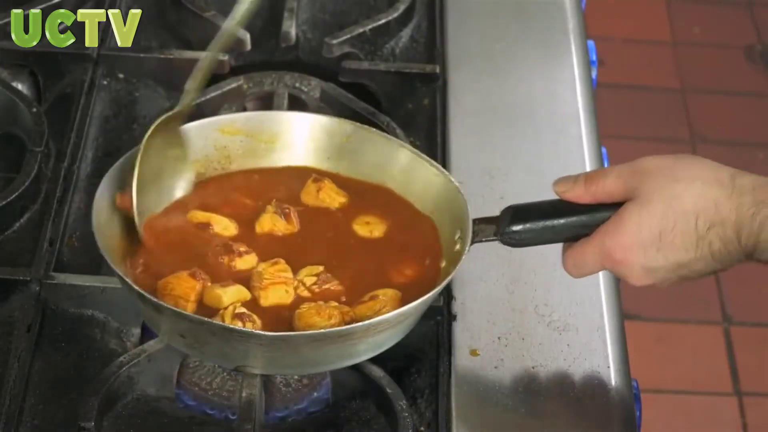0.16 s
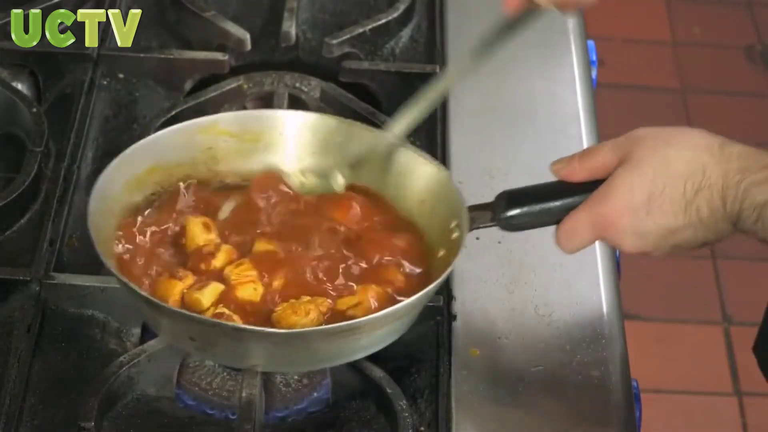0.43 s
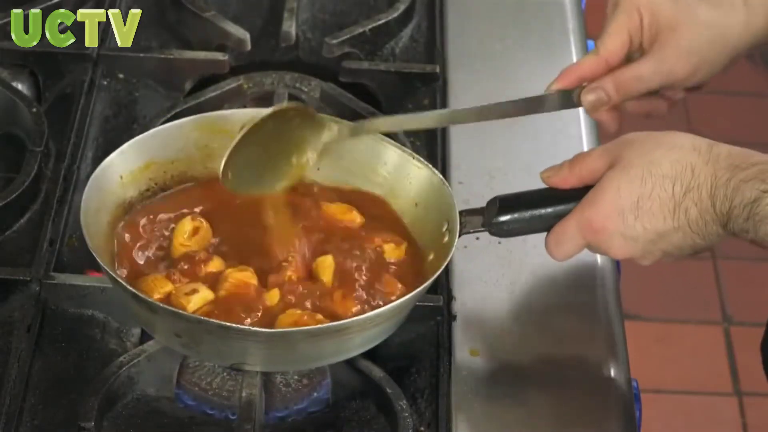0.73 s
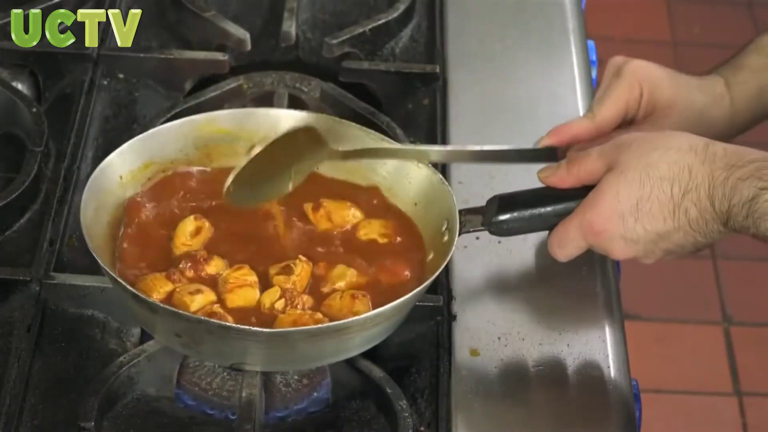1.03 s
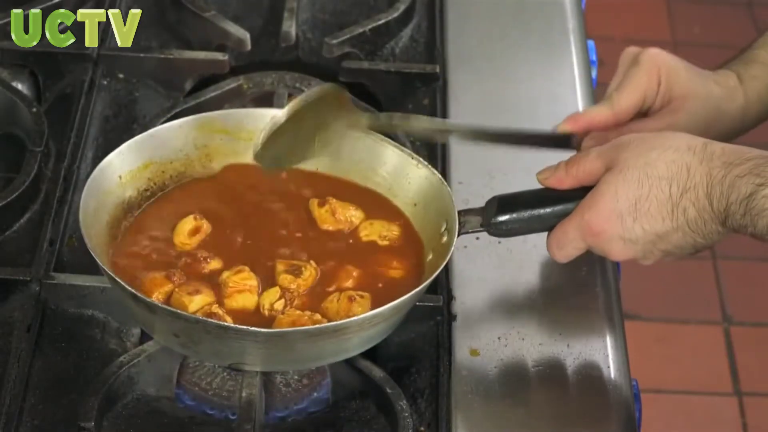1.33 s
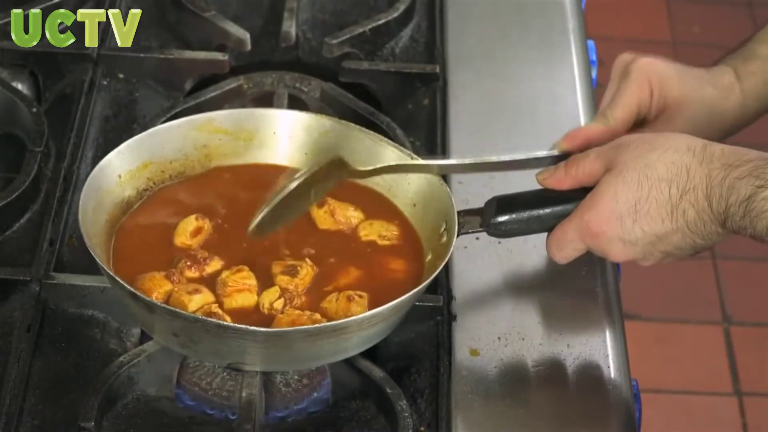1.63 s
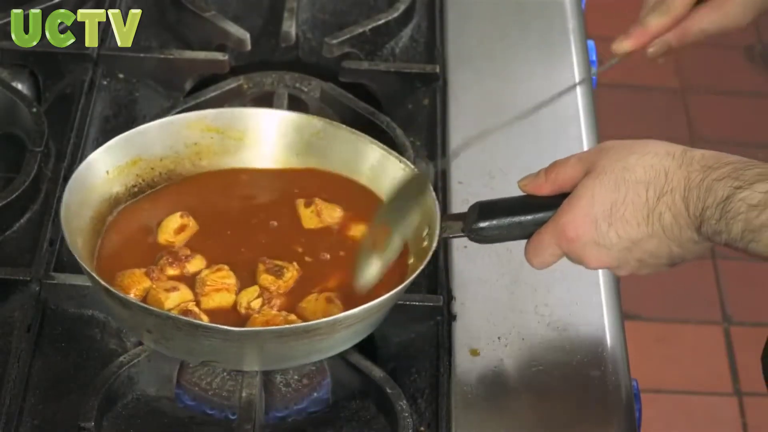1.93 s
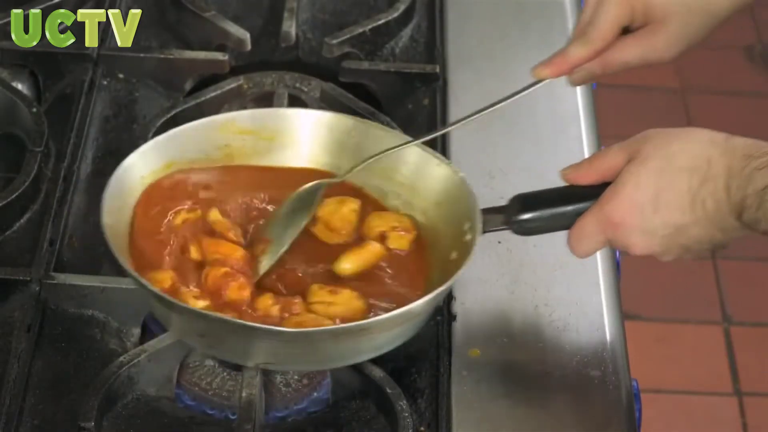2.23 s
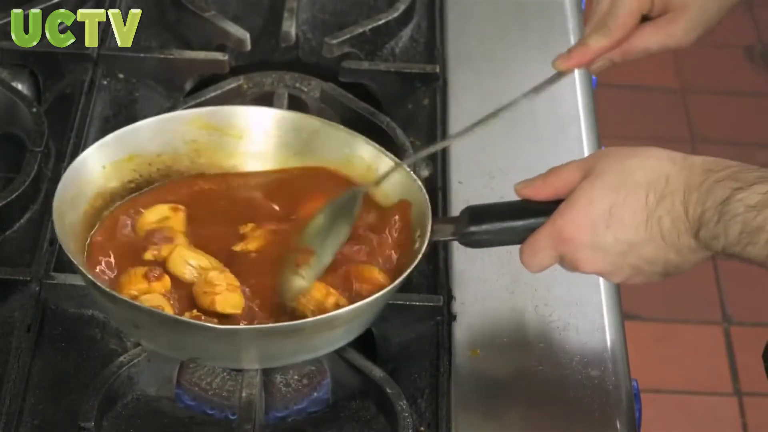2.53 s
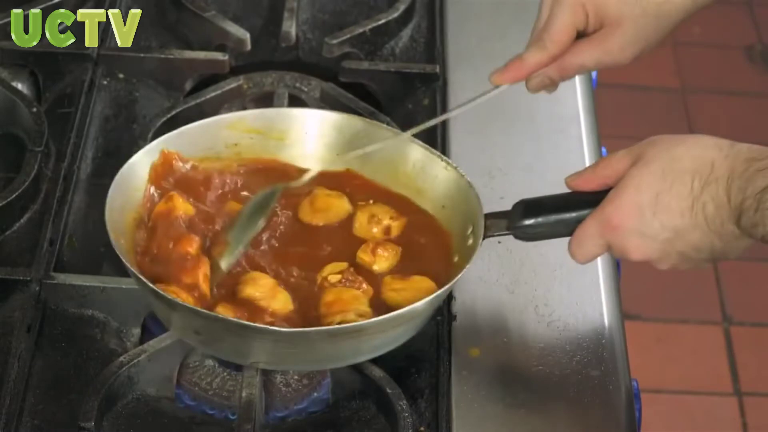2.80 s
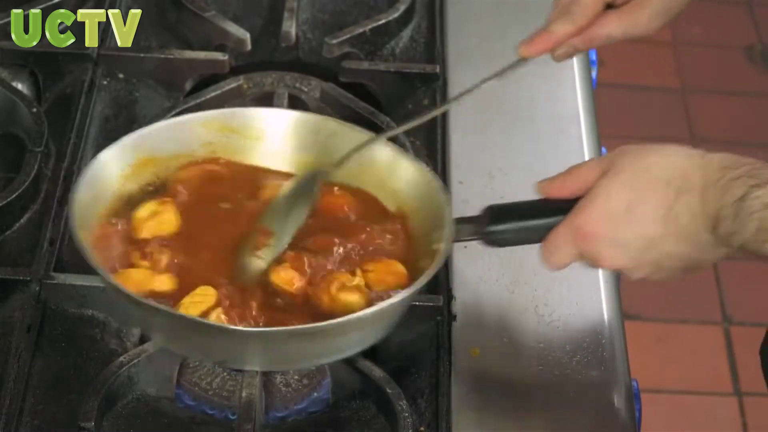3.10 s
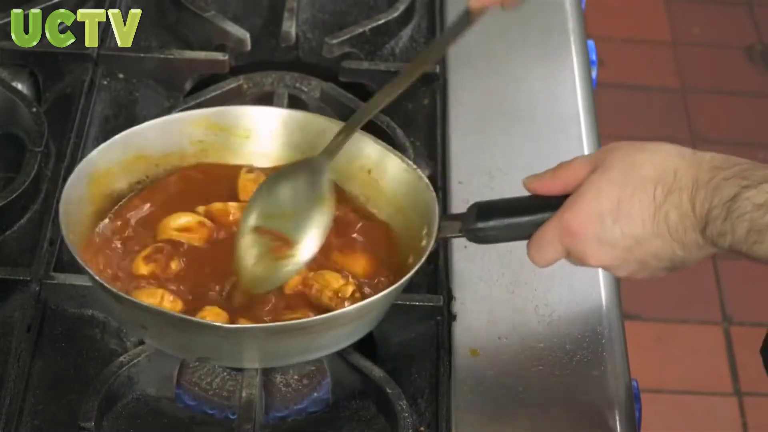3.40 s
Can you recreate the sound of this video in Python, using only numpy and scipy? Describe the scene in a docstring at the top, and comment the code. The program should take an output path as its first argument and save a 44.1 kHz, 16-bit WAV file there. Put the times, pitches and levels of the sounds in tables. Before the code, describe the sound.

A metal spoon scrapes through sauce in a steel frying pan, knocks four times on the ringing rim, then drops back in and stirs on. Faint sizzling, a fan hum and a gas burner lie underneath in a kitchen.

```python
"""A kitchen fan hums and a gas burner rushes under chicken curry sizzling on a hot frying pan.
A steel spoon squelches through the sauce; its slips and catches excite pan and spoon resonances.
It clacks in the pan, is knocked clean four times on the ringing rim, drops back in and stirs on.
The tiled kitchen adds a short tail; a limiter ducks the hum under each knock."""
import sys
import numpy as np
from scipy import signal
from scipy.io import wavfile
from scipy.ndimage import uniform_filter1d

SR = 44100
rng = np.random.default_rng(int(sys.argv[2]) if len(sys.argv) > 2 else 0)


def bounce(signal):
    """Save signal as a 16-bit WAV file at the path given by the first command-line argument."""
    frames = np.transpose(np.atleast_2d(signal))
    limited = np.clip(frames, -1, 1)
    pcm = np.round(limited * 32767).astype(np.int16)
    wavfile.write(sys.argv[1], SR, pcm)


N = 156555
TIME, HZ = np.arange(N) / SR, np.fft.rfftfreq(8192, 1 / SR)

# fan tones: f/Hz, level/dB
FAN_TONES = [(87, -56), (100.4, -42), (107, -57), (200.8, -58.5), (245.5, -60.5), (301.2, -65.5)]
# sizzle and squelch envelopes: t/s, level/dB
SIZZLE_ENVELOPE = [(0, -49.5), (.08, -49.5), (.25, -49.5), (.45, -48), (.6, -63), (.75, -55), (.85, -61.5),
                   (.95, -76), (1.2, -56), (2.08, -75), (2.2, -55), (2.38, -61), (2.55, -54.5), (2.73, -48),
                   (2.86, -57), (3.1, -54), (3.42, -49), (3.55, -64.5)]
SQUELCH_ENVELOPE = [(0, -53.5), (.18, -48.5), (.3, -51.5), (.45, -43), (.62, -55.5), (.8, -56), (1, -62.5),
                    (2.05, -64.5), (2.25, -43.5), (2.4, -51), (2.55, -46.5), (2.63, -52), (2.75, -43.5),
                    (2.87, -57), (2.95, -42), (3.1, -52.5), (3.35, -51), (3.55, -55.5)]
# spits of hot sauce: t/s, f/Hz, level/dB
SPITS = [(0.027, 14000, -43), (0.061, 13700, -42), (.215, 14500, -42), (0.312, 11800, -41),
         (0.78, 5450, -40.5), (0.997, 10400, -46), (2.726, 9800, -41.5), (3.459, 14200, -44),
         (3.538, 10500, -41)]
# spoon strokes: t/s, length/s, level/dB, tilt/(dB/oct), lower and upper spoon mode f/Hz, sauce heap/0-1
STROKES = [(0.142, 0.059, -52, -1, 2910, 4470, 0.63), (.25, 0.034, -49.5, 4, 2040, 4800, 0.76),
           (0.333, 0.066, -41.5, 4, 1850, 4620, 0.68), (0.426, 0.045, -34.5, 6, 1910, 4700, 1),
           (2.131, 0.17, -42, 4.5, 2090, 5020, 0.16), (2.412, 0.13, -46, 0, 2400, 4380, 0.43),
           (2.632, 0.093, -35, -0.5, 2330, 4570, 0.12), (2.897, 0.033, -45, -3, 2340, 3300, 0.15),
           (2.938, 0.041, -32.5, 3, 2190, 3970, 0.17), (2.992, 0.06, -33, 1, 2740, 4100, 0.22),
           (3.135, 0.037, -40.5, -1.5, 2600, 4740, 0.08), (3.168, 0.039, -27, 0, 1800, 4650, 0.02),
           (3.205, 0.035, -27, -2, 2380, 4370, .03)]
# spoon edge catching: t/s, level/dB
CATCHES = [(0.153, -35), (0.17, -30), (0.174, -25), (.187, -30.5), (0.261, -30.5), (.2793, -37),
           (0.3425, -25), (0.4316, -30), (0.4391, -29), (2.192, -24.5), (2.2186, -20), (2.247, -26),
           (2.2538, -15.5), (2.284, -32), (2.4208, -40.5), (2.4536, -26), (2.4699, -30), (2.478, -27),
           (2.504, -28), (2.6513, -28), (2.672, -25), (2.6897, -13.5), (2.7063, -13.5), (2.8989, -28),
           (2.916, -19), (2.943, -19.5), (2.98, -22), (3.016, -21), (3.025, -23), (3.054, -19),
           (3.1487, -32), (3.1539, -25), (3.162, -20), (3.178, -11), (3.2083, -21.5), (3.243, -12),
           (3.258, -27), (3.3264, -30)]
# filled pan modes: f/Hz, width/Hz, boost/dB
PAN_MODES = [(1060, 42, 17), (1650, 56, 10), (2470, 48, 13), (3890, 110, 6)]
# spoon landings: t/s, level/dB, cutoff f/Hz, T60/s, thud level/dB, clank f/Hz, clank boost/dB
CLACKS = [(0.6891, -19, 2560, 0.053, -24.5, 1845, 7), (0.7141, -40.5, 2400, 0.089, -46, 2530, 15),
          (2.0907, -20, 12400, 0.056, -58, 4440, 13), (2.1082, -10, 6450, 0.059, -29, 4100, 8),
          (3.3820, -19.5, 3200, 0.028, -29, 6820, 19), (3.417, -33, 2180, 0.1, -34.5, 2070, 9)]
# rim knocks: t/s, level/dB, tilt/(dB/oct), rebound delay/s, rebound level/dB,
# resonance f/Hz, its boost/dB, singing partial f/Hz
KNOCKS = [(1.0435, -18, -0.5, .023, -10, 2020, 10, 10040), (1.252, -13.5, 0, .023, -12, 880, -7, 7720),
          (1.4723, -15.5, -0.23, .022, -14.5, 1210, 3.5, 5960),
          (1.7113, -9.5, 0.63, 0.0092, -49.5, 1380, 7.5, 10097)]
# ringing modes of pan and spoon: f/Hz, level/dB
RING_MODES = [(598, -7), (897, -3), (938, -7), (997, -3), (1066, -4), (1168, -1), (1268, -4), (1429, -4),
              (1648, -2), (2035, 0), (2225, -4), (3905, -8), (4374, -9), (5210, -10), (5647, -10),
              (5938, -8), (6427, -8), (6562, -9), (7714, -9), (7988, -11), (10200, -11), (10960, -15),
              (13124, -17)]
# source spectral shapes: f/Hz, relative level/dB
BURNER_SHAPE = [(20, 7), (55, -7), (75, 0), (95, 26.5), (115, 5), (150, -2), (190, 6), (300, -1),
                (500, -12.5), (1000, -35.5), (3000, -31), (8000, -20), (15000, -27)]
SIZZLE_SHAPE = [(200, 13), (1500, 7.5), (4000, 2), (7000, -5), (11000, -6), (15500, -7.5)]
SQUELCH_SHAPE = [(60, -11), (180, -9.5), (330, 4), (500, -1), (900, -5), (2000, -19.5), (5000, -59)]
SCRAPE_SHAPE = [(100, -23), (400, -12), (800, -12), (1250, -4.5), (1600, -3), (2300, -7.5), (3300, 0),
                (4400, -14), (6000, -16), (9000, -26), (11500, -29.5), (15000, -46)]
CLACK_SHAPE = [(100, -29.5), (500, -11.5), (1100, -20), (1500, -9), (2000, -1), (2400, -3.5), (2850, -10.5),
               (3600, -16.5), (4200, -10.5), (4800, -13), (5400, -10), (7000, -16.5), (11500, -11.5),
               (15000, -19)]
THUD_SHAPE = [(40, -9.5), (150, -13), (350, 0), (600, -4), (1100, -3.5), (2500, -23), (15000, -102)]
KNOCK_SHAPE = [(60, -18.5), (200, -6.5), (500, -8), (1000, -2), (2100, -3.5), (3200, -10), (4700, -11.5),
               (6000, -8), (7300, -10), (8100, -11.5), (8800, -15.5), (10700, -11), (12500, -27),
               (13200, -17.5), (15500, -33.5)]
REBOUND_SHAPE = [(60, -42), (500, 3.5), (1100, 7.5), (2600, -1), (4000, -2.5), (8000, -47), (15000, -35)]
# decay by band: f/Hz, T60/s
KNOCK_DECAY = [(200, 0.66), (600, 0.21), (1500, 0.22), (3500, 0.27), (6500, 0.32), (10000, 0.26),
               (15000, 0.44)]
ROOM_DECAY = [(200, 0.2), (1500, 0.2), (5000, 0.13), (15000, 0.32)]


def amp(db):
    """Decibels to gain."""
    return 10 ** (np.asarray(db) / 20)


def unit(x):
    """Scale to rms 1."""
    return x / np.sqrt(np.mean(x ** 2) + 1e-20)


def fade(t, t60_s):
    """Exponential decay."""
    return np.exp(-np.log(1000) * t / t60_s)


def read(points, hz=HZ):
    """Interpolate a table over log frequency."""
    f, value = np.transpose(points)
    return np.interp(np.log(hz + 1), np.log(f), value)


def envelope(points):
    """Gain per sample from a level table."""
    return amp(np.interp(TIME, *np.transpose(points)))


def add(mix, start_s, sound):
    """Mix a sound in at start_s."""
    part = mix[max(round(start_s * SR), 0):][:len(sound)]
    part += sound[:len(part)]


def tilt(db_per_oct):
    """Slope in dB about 2 kHz, flat below 500 Hz."""
    return db_per_oct * np.log2(np.maximum(HZ, 500) / 2000)


def bump(hz, width_hz, db):
    """One resonance as a boost in dB."""
    return db / (1 + (2 * (HZ - hz) / width_hz) ** 2)


def colour(x, shape_db):
    """Minimum-phase filter of unit energy."""
    log_gain = np.log(amp(np.r_[shape_db, shape_db[-2:0:-1]]))
    response = np.exp(np.conj(signal.hilbert(log_gain)))
    taps = np.fft.ifft(response).real[:len(shape_db)]
    return signal.fftconvolve(x, taps / np.linalg.norm(taps))[:len(x)]


def drift(size, step_s):
    """Gaussian values step_s apart, joined by lines."""
    return np.interp(np.arange(size) / SR / step_s, np.arange(N), rng.standard_normal(N))


def grains(size, per_s, spread_db):
    """Random clicks, rms 1."""
    chance, strength, sign = rng.random((3, N))[:, :size]
    gain = amp(-spread_db * np.log(np.maximum(strength, .015)))
    return unit((chance < per_s / SR) * gain * np.sign(sign - .5))


def burst(shape_db, t60_s):
    """Dense modes as noise decaying from rms 1; t60_s is a number or a table by band."""
    noise = unit(colour(rng.choice([-1., 1.], SR), shape_db))[SR // 3:]
    hz, t, bands = signal.stft(noise, SR, nperseg=256)
    band_t60_s = read(t60_s, hz)[:, None] if np.ndim(t60_s) else t60_s
    return signal.istft(bands * fade(t, band_t60_s), SR, nperseg=256)[1]


def fan(waver_db=.7):
    """Wavering hum; neighbouring tones beat."""
    out = np.zeros(N)
    for hz, db in FAN_TONES:
        gain = amp(db + waver_db * drift(N, step_s=.08))
        out += gain * unit(np.sin(2 * np.pi * (hz * TIME + rng.random())))
    return out


def burner(level_db=-47):
    """Steady low rush of the gas flame."""
    return amp(level_db) * colour(rng.standard_normal(N), read(BURNER_SHAPE))


def sizzle(decay_cycles=5, spurt_db=5.5, hiss_db=-2.5):
    """Tiny bubbles burst on hot steel in spurts, over a fine hiss."""
    pops, t = np.zeros(N), TIME[:256]
    for hz in np.linspace(6600, 14530, 20):  # large to small bubbles
        age = t * hz / decay_cycles
        pop = unit(age * np.exp(-age) * np.sin(2 * np.pi * hz * t))
        pops += signal.oaconvolve(grains(N, per_s=170, spread_db=5), pop)[:N]
    spurts = unit(pops * amp(spurt_db * drift(N, step_s=.012)))
    hiss = amp(hiss_db) * rng.standard_normal(N)
    return colour(spurts + hiss, read(SIZZLE_SHAPE)) * envelope(SIZZLE_ENVELOPE)


def squelch():
    """Sauce pushed by the spoon: dense, dull clicks."""
    return colour(grains(N, per_s=740, spread_db=0), read(SQUELCH_SHAPE)) * envelope(SQUELCH_ENVELOPE)


def spits(half_width_ratio=.22):
    """Hot sauce spits: single bright ticks."""
    out = np.zeros(N)
    for start_s, hz, db in SPITS:
        band_db = -20 * np.log10(1 + ((HZ / hz - 1) / half_width_ratio) ** 2)
        add(out, start_s, amp(db) * burst(band_db, t60_s=.023))
    return out


def scrapes(judder_db=-3.5, catch_boost_db=1, spoon_width_hz=560):
    """Slips and hard catches excite pan and spoon; grip and heaped sauce shift the modes."""
    out = np.zeros(N)
    catch_decay = fade(TIME[:512], t60_s=.0079)
    for start_s, length_s, db, db_per_oct, lower_hz, upper_hz, heap in STROKES:
        size = int(length_s * SR)
        arch = abs(np.sin(np.linspace(0, np.pi, size))) ** .54
        pressure = arch * amp(judder_db * drift(size, step_s=.00276))
        slips = unit(pressure * grains(size, per_s=2500, spread_db=4))
        friction = amp(db) * np.pad(slips, (0, len(HZ)))
        for catch_s, catch_db in CATCHES:
            latest_stroke_s = max(row[0] for row in STROKES if row[0] <= catch_s)
            if latest_stroke_s == start_s:
                chatter = catch_decay * rng.choice([-1., 1.], len(catch_decay))
                add(friction, catch_s - start_s, amp(catch_db + catch_boost_db) * chatter)
        # sauce heaped on the wall lowers and damps the pan modes
        pan_db = sum(bump(hz * (1 - .11 * heap ** 2), width_hz * (1 + 1.16 * heap), boost_db / (1 + heap))
                     for hz, width_hz, boost_db in PAN_MODES)
        spoon_db = bump(lower_hz, spoon_width_hz, db=10) + bump(upper_hz, spoon_width_hz, db=7)
        spoon_db += bump((lower_hz + upper_hz) / 2, spoon_width_hz, db=-12)
        add(out, start_s, colour(friction, read(SCRAPE_SHAPE) + tilt(db_per_oct) + pan_db + spoon_db))
    return out


def clacks():
    """The spoon lands: a sauce-damped clank and a thud of the pan on its grate."""
    out = np.zeros(N)
    for start_s, db, cutoff_hz, t60_s, thud_db, clank_hz, boost_db in CLACKS:
        rolloff_db = 10 * np.log10(1 + (HZ / cutoff_hz) ** 5)
        clank_db = read(CLACK_SHAPE) - rolloff_db + bump(clank_hz, width_hz=150, db=boost_db)
        add(out, start_s, amp(db) * burst(clank_db, t60_s))
        add(out, start_s, amp(thud_db) * burst(read(THUD_SHAPE), t60_s=.16))
    return out


def ring(t, level_db=-9, spread_db=2):
    """Pan and spoon modes, their strengths varying per strike."""
    out = np.zeros(len(t))
    for hz, db in RING_MODES:
        gain = amp(level_db + db + spread_db * rng.standard_normal())
        out += gain * fade(t, read(KNOCK_DECAY, hz)) * np.sin(2 * np.pi * (hz * t + rng.random()))
    return out


def knocks(rise_s=.0046, clash_s=.012, clash_db=3.5, sing_db=-18, ripple_db=3, ripple_step_hz=110):
    """The spoon strikes the rim, rings and rebounds; each spot struck favours other modes."""
    out = np.zeros(N)
    for start_s, db, db_per_oct, delay_s, rebound_db, hz, boost_db, sing_hz in KNOCKS:
        ripple = np.interp(HZ / ripple_step_hz, np.arange(len(HZ)), rng.standard_normal(len(HZ)))
        shape_db = read(KNOCK_SHAPE) + tilt(db_per_oct) + bump(hz, width_hz=110, db=boost_db)
        shape_db += ripple_db * ripple * np.minimum(HZ / 5000, 1)
        body = burst(shape_db, KNOCK_DECAY)
        t = TIME[:len(body)]
        sing = amp(sing_db) * fade(t, t60_s=.32) * np.sin(2 * np.pi * sing_hz * t)
        clash = amp(clash_db) * np.exp(-(t / clash_s) ** 2)
        strike = (body * (1 + clash) + ring(t) + sing) / 2
        add(out, start_s, amp(db) * np.minimum(t / rise_s, 1) * strike)
        add(out, start_s + delay_s, amp(rebound_db) * rebound(t))
    return out


def rebound(t, start_hz=3200, fall_s=.005):
    """The spoon bounces and skids: a tap and a chirp falling one octave."""
    skid_hz = start_hz * (1 + np.exp(-t / fall_s)) / 2
    skid = np.sin(2 * np.pi * np.cumsum(skid_hz) / SR) * fade(t, t60_s=.036)
    return burst(read(REBOUND_SHAPE), t60_s=.062) + skid


def room(x, level_db=-7.5, rise_s=.0021):
    """Short diffuse tail from the tiles."""
    tail = burst(np.zeros_like(HZ), ROOM_DECAY)
    tail *= np.minimum(TIME[:len(tail)] / rise_s, 1)
    return amp(level_db) * signal.fftconvolve(x, tail / np.linalg.norm(tail))[:N]


def scene():
    """Spoon and sauce with room tail, over fan and burner; mono."""
    cooking = knocks() + clacks() + scrapes() + squelch() + sizzle() + spits()
    return (cooking + room(cooking) + fan() + burner())[None]


def record(dry):
    """Look-ahead limiter with slow release, then band limits."""
    threshold_db, slope, release_db_per_s, look_ahead_s = -24, .36, 58.5, .001
    low_cut_hz, high_cut_hz = 71, 15530
    power_db = 10 * np.log10(abs(uniform_filter1d(dry[0] ** 2, size=200)) + 1e-12)
    release_db = TIME * release_db_per_s
    held_db = np.maximum.accumulate(power_db + release_db) - release_db
    over_db = uniform_filter1d(np.maximum(held_db - threshold_db, 0), size=200)
    duck_db = slope * np.interp(TIME + look_ahead_s, TIME, over_db)
    highpass = signal.butter(2, low_cut_hz, "high", fs=SR, output="sos")
    lowpass = signal.firwin(511, high_cut_hz, window=("kaiser", 9), fs=SR)
    return signal.oaconvolve(signal.sosfilt(highpass, dry / amp(duck_db)), lowpass[None], "same")


dry = scene()
out = record(dry)
bounce(out)
```